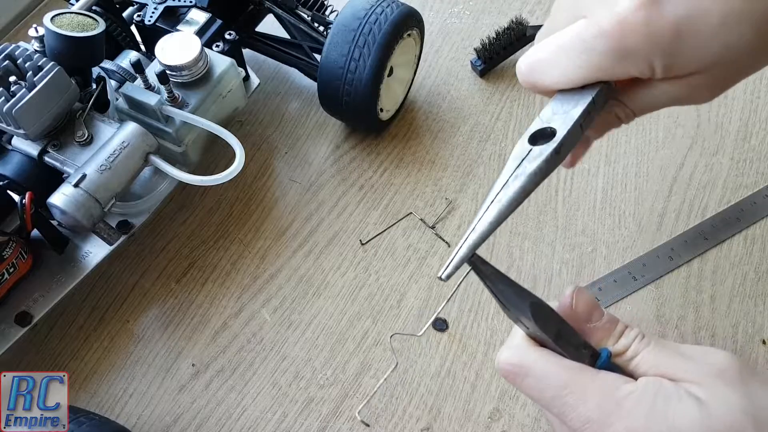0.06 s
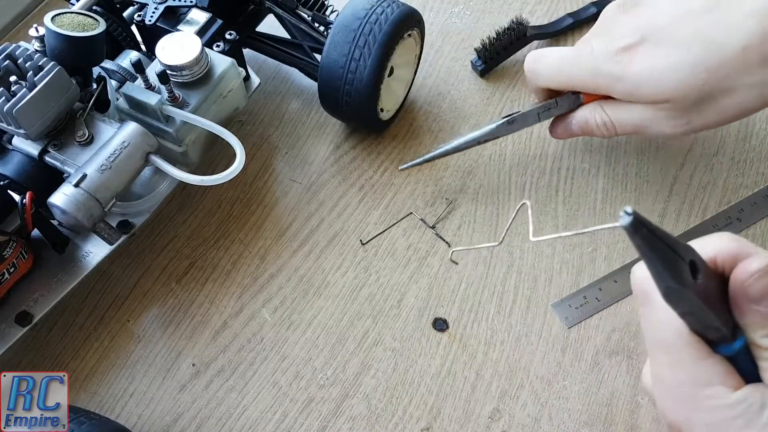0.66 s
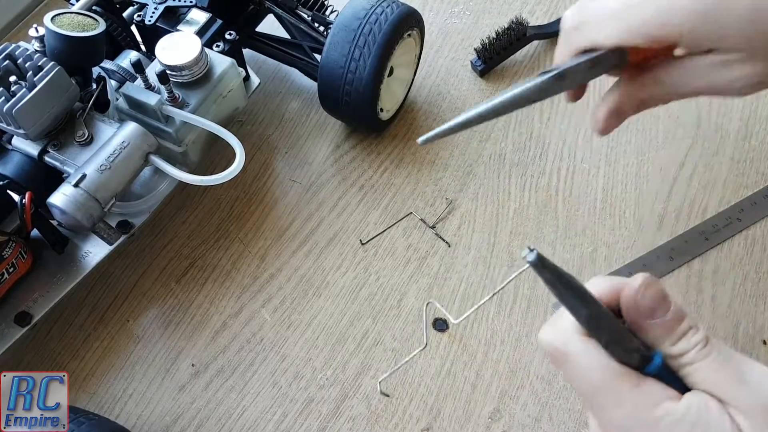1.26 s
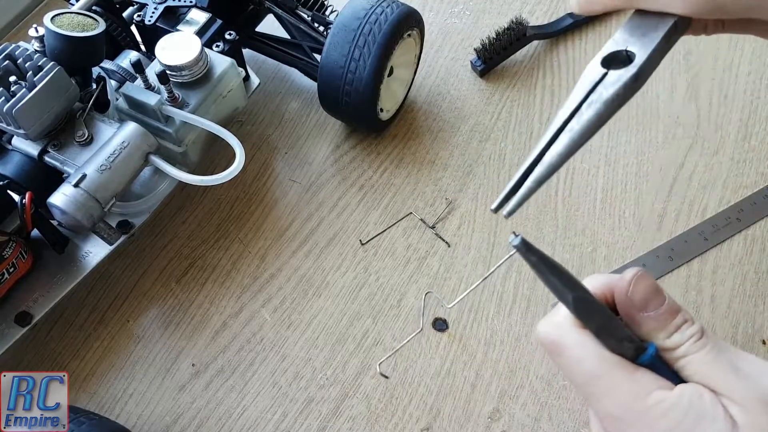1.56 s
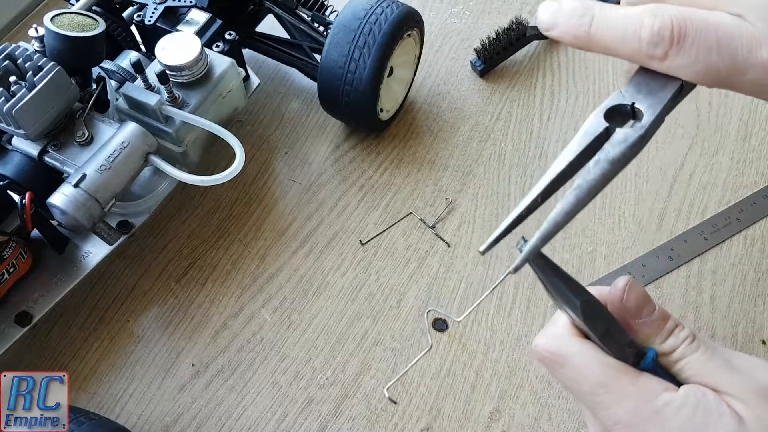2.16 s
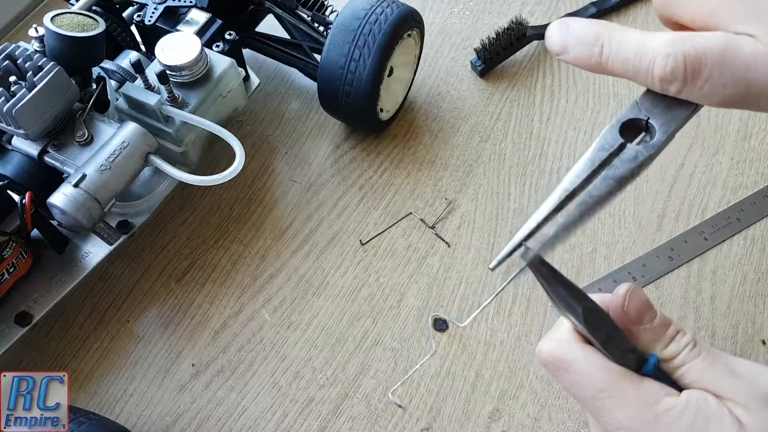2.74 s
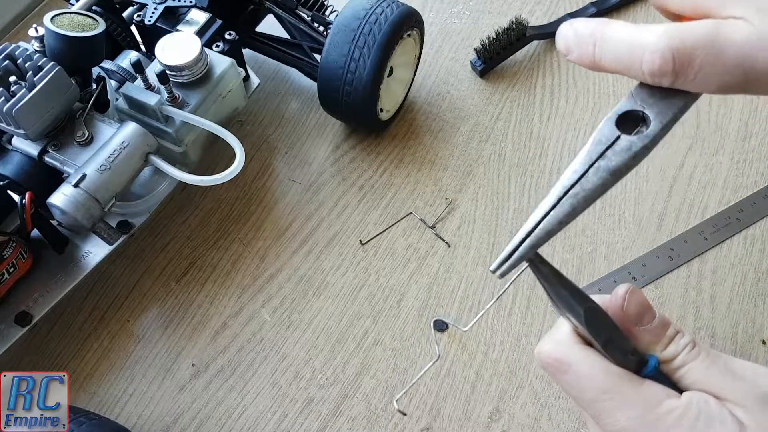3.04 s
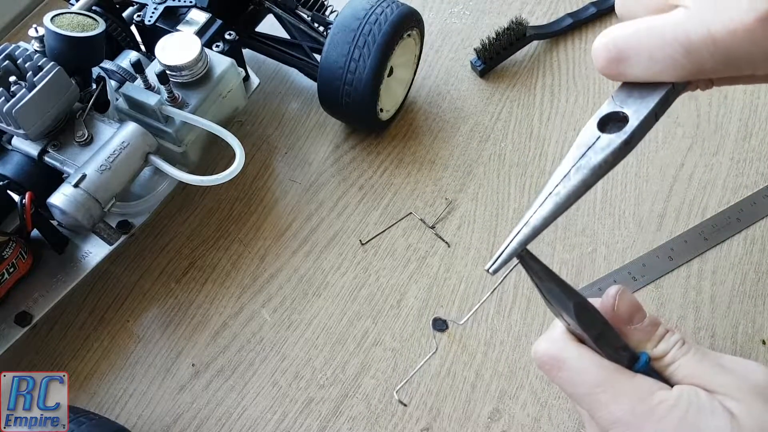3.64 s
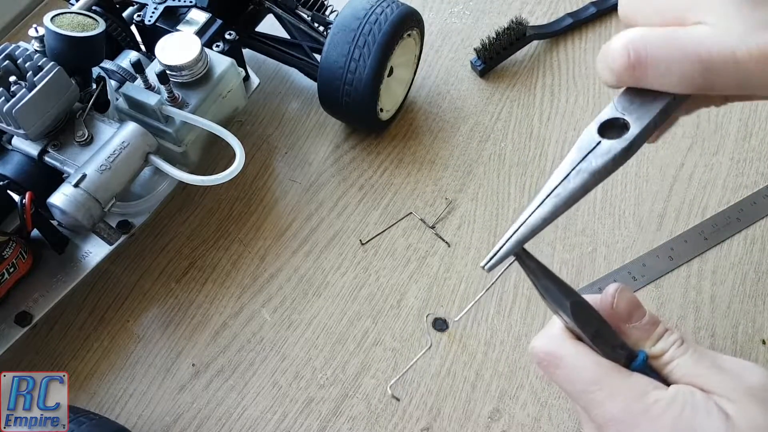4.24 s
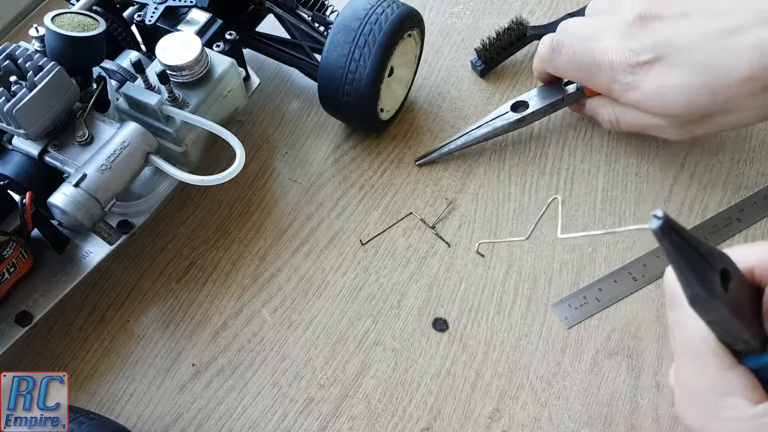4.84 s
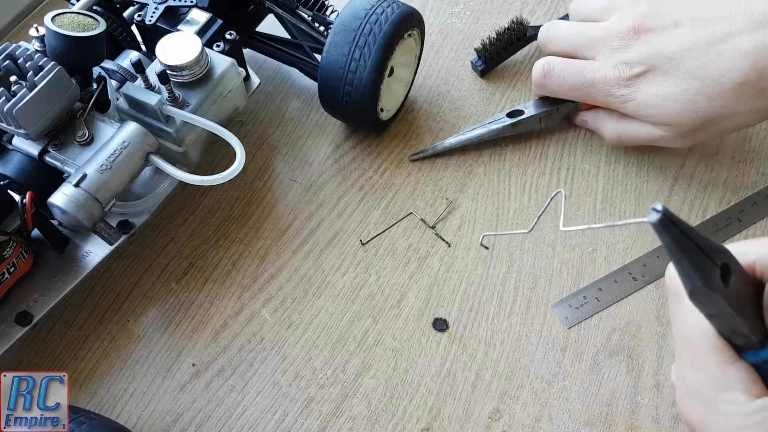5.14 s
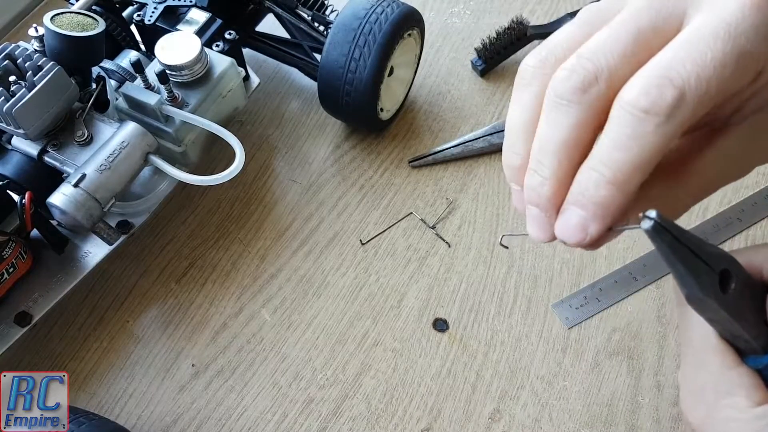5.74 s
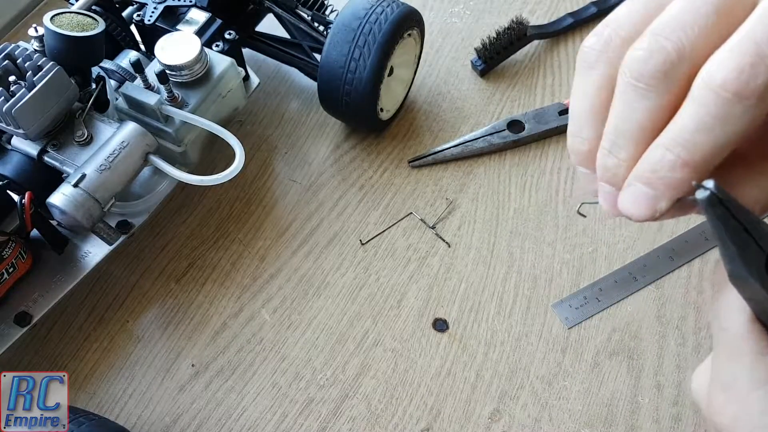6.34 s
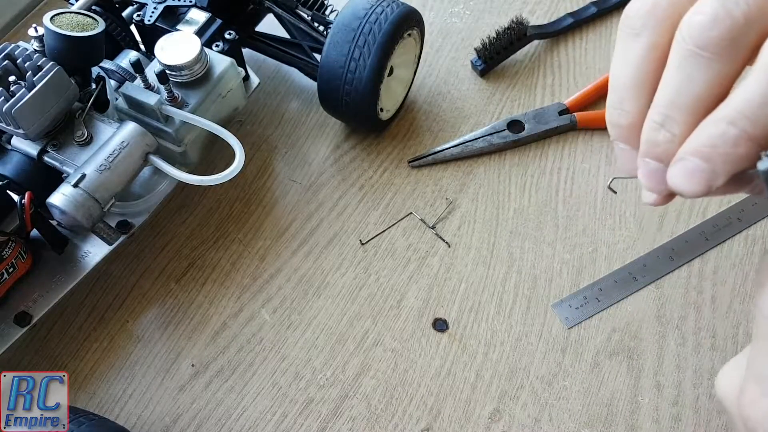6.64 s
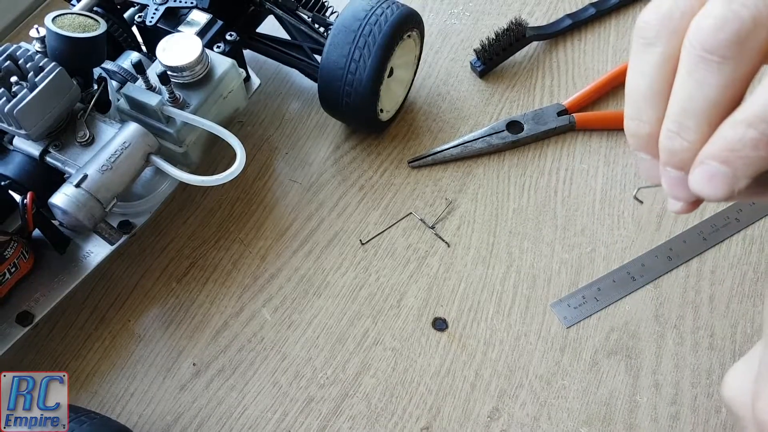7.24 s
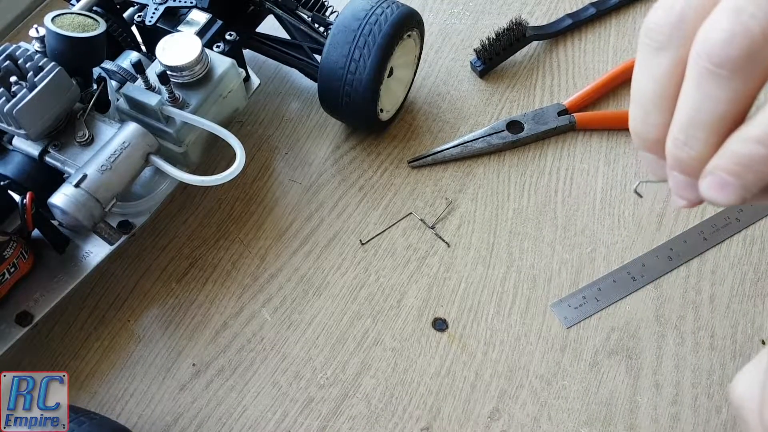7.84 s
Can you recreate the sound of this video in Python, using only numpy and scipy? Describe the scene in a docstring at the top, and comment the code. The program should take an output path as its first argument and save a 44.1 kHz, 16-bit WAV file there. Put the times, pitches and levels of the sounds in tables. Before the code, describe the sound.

Two pairs of small pliers work a thin steel wire, heard close and slightly to the right in a small room with soft air and a low hum. Faint metal ticks open, with a clearer click at 0.5 seconds and a hollow knock on a wooden table at 0.9. From about 2 seconds the jaws tick and scrape lightly along the wire, then snap off sharply at 2.9, leaving a faint, brief twang. A smaller click follows at 3.2 and a light one at 4.4. Around 4.9 and 5.1 seconds one pair knocks on the table, then is laid down with a quick wooden clatter and steel clinks from 5.3 to 5.5, the loudest moment. Afterwards there are only a few tiny ticks. A bird sings very faintly outside from about 5 to 7 seconds, and the quiet hum lasts until about 8.

```python
"""Two pairs of small pliers grip and kink a thin steel wire above a wooden table, close up in stereo.
The jaws tick, scrape and snap off the wire, each contact a crack of noise and a short steel ring;
the freed wire twangs. One pair knocks on the table, stirring the wood's modes, and is then laid down
with a clatter. A small room answers every hit over soft air and a low hum; a bird sings faintly outside."""
import sys
import numpy as np
from scipy import signal
from scipy.fft import rfft, irfft, next_fast_len
from scipy.io import wavfile

SR = 44100
rng = np.random.default_rng(int(sys.argv[2]) if len(sys.argv) > 2 else 0)


def dump_mix(stems):
    """Bounce the given channels to the path in sys.argv[1] as a 16-bit WAV at rate SR."""
    frames = np.atleast_2d(stems).T  # one column per channel
    limited = np.clip(frames, -1, 1)  # hard clip at full scale
    pcm = np.round(limited * 32767).astype(np.int16)
    wavfile.write(sys.argv[1], SR, pcm)


N = 347930
HIT_TIME = np.arange(int(.2 * SR)) / SR  # the seconds over which one hit rings out

# The room's air. Each row: frequency in Hz, relative level in dB.
AIR_SPECTRUM = [(15, -31.5), (25, 0.5), (76, -3), (161, -6.5), (242, -5.5), (285, -9.5), (384, -9.5),
                (416, -15), (531, -17.5), (641, -19), (1040, -20), (2110, -28.5), (3820, -42), (11600, -55),
                (16000, -63.5)]
# The air's low end, one list before and one after the pliers are laid down.
# Each row: time in seconds, level in dB.
RUMBLE_CURVES = [
    [(0.0, -66.5), (1.95, -71), (3.18, -64.5), (4.8, -68.5)],
    [(5.8, -75), (6.54, -68.5), (7.5, -74.5), (7.89, -71.5)],
]
# The hum. Each row: pitch in Hz, width in Hz, loudest level in dB, time of that swell in seconds,
# its half length in seconds.
HUM_TONES = [(68.3, 3, -72.5, 2.6, .5), (128, 2.3, -69.5, 3.2, 0.43), (205.3, 14, -71.5, 3.3, 1.5),
             (237, 4, -69, 3.8, .6), (259.5, 3.6, -69.5, 4.7, 1.2)]
# Light touches on free steel. Each row: start in seconds, level in dB, pitch favoured by the spot
# struck in Hz, its reach in octaves (small for a pure ping).
CLINK_HITS = [(0.12, -61, 1530, 1), (0.213, -53.5, 1360, 0.91), (0.212, -64, 4700, 0.88),
              (0.2577, -56.5, 1160, 0.99), (0.3180, -55, 1760, 1), (0.4995, -47, 6440, 0.34),
              (0.5, -51.5, 3650, 0.17), (0.5002, -48.5, 4760, 0.21), (0.5, -53.5, 1040, .3),
              (0.5012, -49, 2270, 0.4), (2.0047, -55, 1790, 0.72), (2.213, -59, 1700, 0.92),
              (2.4427, -56, 1680, 1), (2.536, -60, 1500, 1), (2.5425, -49, 2500, 1),
              (2.684, -53, 1750, 0.95), (2.881, -35.5, 1820, .7), (2.891, -42.5, 1700, .7),
              (3.1655, -63, 2900, .5), (3.207, -47, 3000, 0.27), (4.3713, -50.5, 3050, 0.14),
              (4.372, -58, 4234, .2), (4.417, -63.5, 4200, .4), (4.418, -55, 1000, .4),
              (6.6303, -64.5, 3490, 0.43), (6.788, -69, 3360, .4)]
# The pliers ringing freely. Each row: pitch in Hz, level in dB, t60 in seconds.
FREE_STEEL_MODES = [(1030.4, -2, 0.075), (1323, 2.5, 0.018), (1717, 6.5, 0.012), (1994, 0, 0.027),
                    (2276, 2, 0.022), (2713, -1, 0.031), (3050, 0.5, 0.01), (3766, -4.5, 0.024),
                    (4310, -6, 0.031), (4807, -5.5, 0.025), (5385, -0.5, 0.014), (6500, -4, 0.0047)]
# Jaws clicking on the wire. Each row: start in seconds, level in dB, top octave in dB (high for a clean
# snap, low for a gripped wire), pitch of the tips in Hz (moves with the grip), crack against ring in dB.
CLICK_HITS = [(0.2124, -60, 10, 7300, 12), (0.2652, -53.5, -1, 7840, 7), (0.3189, -56, 2, 6600, 16),
              (0.501, -36, 6, 6960, 6), (1.036, -53, 4, 7400, 10), (1.4647, -58, 5, 7500, 16),
              (1.947, -45.5, 3.5, 7500, 3), (2.005, -46.5, -9, 7600, 8), (2.0863, -56, -7, 7800, 10),
              (2.212, -49.5, -6, 7900, -6), (2.37, -52, -6, 7600, 9), (2.5429, -44, -7, 8000, 7),
              (2.6832, -50, 1, 7450, 1), (2.7433, -65, -8, 7200, 0), (2.7736, -50, -1, 7350, 6),
              (2.8804, -20, 0.5, 7620, 0), (3.165, -52.5, -4, 7300, 9), (3.207, -31.5, 2.5, 7700, 5),
              (3.3512, -57, -8, 7200, 10), (4.371, -43, -0.5, 8220, 2), (4.418, -57, -7.5, 7140, 8),
              (5.103, -54, 7, 7250, 3), (5.494, -39.5, 7.5, 7170, 13), (5.5854, -49.5, 4.5, 7630, 8),
              (6.223, -63.5, 1, 7500, 5.5), (6.6288, -58.5, 10, 7550, 5), (6.79, -63.5, -6, 6960, 3)]
# The jaws, damped by the hand. Each row: pitch in Hz, level in dB, t60 in seconds.
HELD_JAW_MODES = [(1390, -6, 0.0041), (1592, -1, 0.0055), (2340, -22, 0.033), (2660, -13.5, 0.0138),
                  (4164, -18, 0.007), (5570, -9, 0.009), (6056, -10, .008), (6640, -14, 0.0075),
                  (7410, 7.5, 0.0068), (8000, -5.5, 0.005), (11540, -19.5, 0.00797), (13380, -11, 0.0043),
                  (14300, -10, 0.0045)]
# The crack of steel on steel. Each row: frequency in Hz, relative level in dB.
CRACK_SPECTRUM = [(700, -1.5), (1500, 1.5), (2400, -1.5), (3800, -5), (5500, -4.5), (7500, -2), (8400, -1),
                  (9200, -10.5), (12000, -12.5), (14500, -13)]
# Slides along the wire. Each row: midpoint in seconds, level in dB, half length in seconds.
SLIDES = [(2.023, -72.5, 0.02), (2.219, -64.5, 0.0065), (2.317, -67.5, 0.018), (2.437, -64.5, 0.01),
          (2.536, -67, 0.0093), (2.682, -64, 0.005), (2.8765, -48, .0014), (2.896, -44, 0.0082),
          (2.92, -52, 0.008)]
# Knocks, rebounds and jolts on the table. Each row: start in seconds, level in dB, contact cut-off in Hz,
# bass in dB, flatness from 0 (nose first) to 1 (whole tool), thud pitch in Hz, clink pitch in Hz,
# clink against knock in dB.
TABLE_HITS = [(0.9172, -23.5, 2030, -2, 0.023, 477, 1590, -15.5),
              (1.0355, -39, 1370, 10.5, 0.05, 470, 1610, -16), (1.196, -47.5, 910, 6, 0.18, 500, 1550, -17),
              (2.8792, -47, 257, 4, 0.85, 600, 1513, -10.5), (4.8798, -30, 1580, 13, 0.09, 419, 1890, -18),
              (4.9, -40, 1380, 4, 0.24, 330, 1290, -4), (5.0505, -41.5, 613, 8, 0.13, 402, 4500, -26),
              (5.117, -23, 2240, -3.5, 0.032, 513, 2230, -20), (5.195, -43.5, 410, 6, 1, 350, 1500, -18),
              (5.268, -45.5, 374, 6, 0.83, 400, 2300, -26), (5.334, -16, 1210, 2, 1, 446, 1040, -14.5),
              (5.3445, -25, 1300, -3, 0.59, 676, 2300, -29), (5.356, -23, 1090, -6, 1, 426, 2800, -24),
              (5.358, -20, 910, -7, 0.72, 462, 1100, -10), (5.3684, -19.5, 900, -4, 0.63, 424, 1400, -18),
              (5.3893, -28, 890, -11, 0.65, 430, 1150, -21),
              (5.4233, -12.5, 680, 1, 0.83, 435, 2370, -22.5),
              (5.4379, -18.5, 900, -8, 0.66, 450, 1140, -11.5), (5.45, -23, 1000, 2, 0.96, 401, 1960, -14),
              (5.469, -17, 1900, -5.5, 0.85, 486, 1570, -11), (5.479, -29, 1400, 6, 1, 500, 1680, -13),
              (5.4848, -22, 1300, -2, 1, 473, 1380, -13), (5.515, -29.5, 1230, 2.5, 1, 457, 1330, -9),
              (5.532, -34, 700, -2, .7, 470, 1300, -16)]
# The table top. Each row: pitch in Hz, level in dB, t60 in seconds.
TABLE_MODES = [(121.3, -17, 0.17), (191.6, -24.5, 0.073), (221, -19.5, 0.12), (240.2, -17.5, 0.19),
               (311, -15, 0.09), (362.8, -17, 0.084), (453, -20, 0.15), (500, -33, 0.07),
               (599, -20.5, 0.16), (680.5, -21.5, 0.092), (796, -24.5, 0.12), (1102.4, -9, 0.04),
               (1413, 2.5, 0.028), (1505, -1.5, 0.0089), (1807, -9.5, 0.01296), (2260, -10.5, 0.021)]
# The slap of the whole tool landing flat. Each row: pitch in Hz, level in dB, t60 in seconds.
SLAP_MODES = [(231.4, -9, .016), (890, 0.5, 0.014)]
# The board's many weak modes, blurred into noise. Each row: frequency in Hz, relative level in dB.
BOARD_SPECTRUM = [(50, -18.5), (110, -3), (200, -15), (400, 9.5), (700, 0), (1000, -0.5), (1500, -10),
                  (2600, -7.5), (4000, -19), (9000, -44)]
# The wire springing free. Each row: start in seconds, level in dB.
WIRE_RELEASES = [(2.881, -43), (3.206, -81.5)]
# The free wire, bending two ways at slightly different pitches.
# Each row: pitch in Hz, level in dB, t60 in seconds.
WIRE_MODES = [(1967, -6.5, 0.37), (2488, -5, 0.15), (3970, -10, 0.17), (4768, -3.5, .18),
              (5060, -1.5, 0.17), (4900, 12.5, 0.17), (5280, -1, .22), (5390, -2.5, 0.2), (6200, -4, .17),
              (7490, -4.5, 0.16), (8620, -8, 0.12)]
# A songbird far outside. Each row: start in seconds, length in seconds, first pitch in Hz,
# last pitch in Hz, warble depth in Hz, level in dB.
BIRD_NOTES = [(4.12, .09, 7800, 7130, 108, -89), (5.22, .11, 2100, 2370, 70, -71),
              (5.645, .12, 2135, 2347, 75.6, -70.5), (5.69, .05, 5380, 5300, 30, -91),
              (5.854, 0.16, 2790, 1820, 50, -72), (6.11, .06, 5320, 5390, 30, -93),
              (6.12, .1, 2140, 2216, 100, -74.5), (6.205, 0.13, 2348, 2395, 151, -70),
              (6.65, 0.089, 4200, 4410, 198, -87), (6.97, .05, 4190, 4210, 90.5, -88)]
# The colour of the room's answer. Each row: frequency in Hz, relative level in dB.
REVERB_SPECTRUM = [(100, -1.5), (400, -3.5), (1000, -2.5), (2000, 2.5), (5000, 4.5), (8000, 0.5),
                   (15000, 9.5)]
# How long the room rings. Each row: frequency in Hz, t60 in seconds.
REVERB_T60 = [(100, 0.36), (400, 0.45), (1500, 0.36), (5000, 0.34), (8000, 0.25), (15000, 0.17)]
# The side that the tools favour. Each row: frequency in Hz, left minus right in dB.
TOOL_PAN = [(100, 4), (300, -1.5), (550, -4.5), (1200, 0), (2500, -3), (5000, -3), (7700, -7.5), (8600, 3),
            (10500, 5), (15000, 0.5)]


def undb(db):
    """Decibels to gain."""
    return 10 ** (np.asarray(db) / 20)


def unit(x):
    """Scale to rms 1."""
    return x / np.sqrt(np.mean(x ** 2))


def along(points, hz):
    """Read (Hz, value) points on a log-frequency axis."""
    point_hz, values = np.transpose(points)
    return np.interp(np.log(np.maximum(hz, 1)), np.log(point_hz), values)


def butter(x, hz, kind, order=2):
    """Causal Butterworth filter."""
    sections = signal.butter(order, np.minimum(hz, SR / 2 - 100), kind, fs=SR, output="sos")
    return signal.sosfilt(sections, x)


def bands(x):
    """Split into overlapping half-octave bands; yields (Hz, band)."""
    size = next_fast_len(x.shape[-1])
    spectrum = rfft(x, size)
    half_octaves = 2 * np.log2(np.maximum(np.fft.rfftfreq(size, 1 / SR), 1) / 20)
    for k in range(21):
        window = np.maximum(1 - abs(half_octaves - k), 0)
        yield 20 * 2 ** (k / 2), irfft(spectrum * window, size)[..., :x.shape[-1]]


def colour(x, points):
    """Equalise along a curve of (Hz, dB) points."""
    size = next_fast_len(x.shape[-1])
    gain = undb(along(points, np.fft.rfftfreq(size, 1 / SR)))
    return irfft(rfft(x, size) * gain, size)[..., :x.shape[-1]]


def stereo_noise(size, points, apart_hz):
    """Coloured noise at two microphones: long waves reach both alike, short ones do not."""
    mid, side = colour(rng.standard_normal((2, size)), points)
    side = butter(side, apart_hz, "high")
    return unit(np.array([mid + side, mid - side]))


def wander(rate_hz, count=400):
    """A random drift with a spread near 1."""
    return np.interp(np.arange(N) / SR * rate_hz, np.arange(count), rng.standard_normal(count))


def add(out, s, sound):
    """Mix a sound in at s seconds."""
    i = max(int(s * SR), 0)
    out[:, i:i + sound.shape[1]] += sound[:, :N - i]


def hit_level(x, db):
    """Scale a hit so that the crest of its first five milliseconds lies near db."""
    return x * undb(db) / (2 * np.sqrt(np.mean(x[:, :SR // 200] ** 2)))


def stroke_level(x, shape, db):
    """Scale a stereo stroke so that its rms at the top of its shape lies near db."""
    return x * undb(db) / np.sqrt(np.sum(x ** 2) / (2 * np.sum(shape ** 2)))


def impulses(shape, rate_hz):
    """Randomly timed tiny contacts whose strength follows a shape."""
    return (rng.random(len(shape)) < rate_hz / SR) * rng.standard_normal(len(shape)) * shape


def ring(modes, spread, gain_db=0, lag_s=0, apart_hz=550, tuning=1):
    """Struck modes; each blow weights them anew, and each microphone meets them at its own phase."""
    hz, db, t60 = np.transpose(modes)
    scatter_db, detune, phase = rng.standard_normal((3, len(hz)))
    hz = hz * tuning * (1 + .008 * detune)
    phase = phase * spread * np.minimum(hz / apart_hz, 1) ** 2 - np.pi * hz * lag_s
    waves = np.exp(np.outer(2j * np.pi * hz - np.log(1000) / t60, HIT_TIME))
    gain = undb(db + gain_db + scatter_db)
    return np.real(np.array([gain * np.exp(1j * phase), gain * np.exp(-1j * phase)]) @ waves)


def room_tone(air_db=-62, rumble_hz=220, flicker_db=1, wide_hz=700, hum_sink_db=-9.5, pan_db=-0.9):
    """A bed of soft, flickering air whose low end swells and sinks, with a wavering hum."""
    t = np.arange(N) / SR
    rumble_db = np.interp(t, *np.vstack(RUMBLE_CURVES).T) - air_db
    air = unit(colour(rng.standard_normal((2, N)), AIR_SPECTRUM))
    out, sides = 0, np.array([[1], [-1]])
    for hz, (mid, side) in bands(air):
        width = 0.87 * np.clip(hz / wide_hz, 1 / 4, 1)
        band_db = air_db + rumble_db / (1 + (hz / rumble_hz) ** 2) + flicker_db * wander(rate_hz=13)
        out = out + (mid + width * side * sides) * undb(band_db)
    for hz, width_hz, db, loudest_s, half_s in HUM_TONES:
        drift = wander(width_hz) + 1j * wander(width_hz)
        hum = unit(np.real(drift * np.exp(2j * np.pi * hz * t)))
        sunk = 1 - np.exp(-.5 * ((t - loudest_s) / half_s) ** 2)
        out = out + undb(db + hum_sink_db * sunk) * hum
    return out * undb(sides * pan_db / 2)


def clink(db, spot_hz, reach_octaves=1, fade_db=28, attack_s=0.00037):
    """The free steel rings clearly; modes weaken with their distance from the favoured pitch."""
    hz = np.transpose(FREE_STEEL_MODES)[0]
    distance = np.log2(hz / spot_hz) / reach_octaves
    modes = ring(FREE_STEEL_MODES, spread=.45, gain_db=-fade_db * distance ** 2)
    return hit_level(modes * (1 - np.exp(-HIT_TIME / attack_s)), db)


def plier_clinks():
    """Light touches set the pliers ringing."""
    out = np.zeros((2, N))
    for s, db, spot_hz, reach_octaves in CLINK_HITS:
        add(out, s, clink(db, spot_hz, reach_octaves))
    return out


def steel_contact(treble_db, top_db, tuning, crack_db, crack_s=0.0017, attack_s=0.0012):
    """Steel meets steel: a crack of noise and the short ring of the jaws."""
    treble_hz, top_hz = 3740, 8800
    jaws = ring(HELD_JAW_MODES, spread=0.48, tuning=tuning)
    crack = stereo_noise(len(HIT_TIME), CRACK_SPECTRUM, apart_hz=1830) * np.exp(-HIT_TIME / crack_s)
    hit = (jaws + undb(crack_db) * crack) * (1 - np.exp(-HIT_TIME / attack_s))
    # two shelves set the brightness: the treble, then the very top
    hit = butter(hit, treble_hz, "low") - undb(treble_db) * butter(hit, treble_hz, "high")
    top = butter(hit, 1.184 * top_hz, "high", order=4)
    hit = butter(hit, top_hz, "low", order=8) + undb(top_db) * top
    return butter(hit, 1100, "high")


def jaw_clicks(gain_db=-4, neutral_db=-44, treble_per_db=0.85, average_tips_hz=7490):
    """The jaws seat on the wire or snap off it; the harder the click, the brighter."""
    out = np.zeros((2, N))
    for s, db, top_db, tips_hz, crack_db in CLICK_HITS:
        treble_db = treble_per_db * (db - neutral_db)
        hit = steel_contact(treble_db, top_db, tips_hz / average_tips_hz, crack_db)
        add(out, s, hit_level(hit, db + gain_db))
    return out


def grit(shape, db, centre_hz=2100, teeth_hz=450, step_octaves=.45):
    """Single teeth catch on the wire and ring the steel, each of three spots with its own pitch."""
    out = 0
    for spot in range(3):
        catches = impulses(shape, teeth_hz / 3)
        catches[np.argmax(shape) + spot * SR // 700] += .5  # one sure catch near the top of the stroke
        ping = clink(0, centre_hz * 2 ** (step_octaves * (spot - 1)))
        out = out + signal.fftconvolve(catches[None], ping[:, :SR // 20], axes=1)
    return stroke_level(out, shape, db)


def chatter(shape, db, treble_db, top_db, slips_hz=1600, tuning_scatter=0.091):
    """A run of tiny steel contacts at three spots of the jaws, each tuned a little differently."""
    out = 0
    for _ in range(3):
        slips = impulses(shape, slips_hz / 3)
        tuning = 1 + tuning_scatter * rng.standard_normal()
        contact = steel_contact(treble_db, top_db, tuning, crack_db=13.5)
        out = out + signal.fftconvolve(slips[None], contact[:, :SR // 20], axes=1)
    return stroke_level(out, shape, db)


def jaw_scrapes(neutral_db=-58.5, treble_per_db=0.7, grit_db=2, top_db=-14):
    """The serrated jaws slide along the wire in short swelling runs, and skid after every click."""
    skid_after_s, skid_db, skid_half_s = 0.0072, -27, 0.0019
    skids = [(s + skid_after_s, db + skid_db, skid_half_s) for s, db, *_ in CLICK_HITS]
    out, t = np.zeros((2, N)), np.arange(-SR // 10, SR // 10) / SR
    for s, db, half_s in SLIDES + skids:
        shape = np.exp(-.5 * (t / half_s) ** 2)
        # a firm stroke is brighter; a light, dull one is the grittiest
        treble_db = treble_per_db * (db - neutral_db)
        teeth = grit(shape, db + grit_db) / (1 + undb(treble_db))
        add(out, s + t[0], chatter(shape, db, treble_db, top_db) + teeth)
    return out


def wood_knock(db, contact_hz, bass_db, flatness, thud_hz, attack_s=0.0015, boom_s=0.038, board_s=0.016):
    """The table gives with a thud: the nose knocks hollow, the tool laid flat stirs the whole board."""
    bass_hz, hollow_hz, flat_treble_db, boom_db = 302, 950, -8.5, -21
    thud_db, thud_t60_s = 6, 0.0263
    board_db = np.interp(flatness, [0, 1], [-27, -4.5])
    lowest_hz = np.interp(flatness, [0, 1], [138, 83])
    hz, t = np.transpose(TABLE_MODES)[0], HIT_TIME
    # a flat landing weakens the hollow upper modes
    tilt_db = bass_db / (1 + (hz / bass_hz) ** 4) + flatness * flat_treble_db * (hz > hollow_hz)
    modes = ring(TABLE_MODES, spread=0.92, gain_db=tilt_db, lag_s=0.00009)
    thud = ring([(thud_hz, thud_db, thud_t60_s)], spread=1.0, lag_s=0.00014)
    slap = flatness * ring(SLAP_MODES, spread=0.82)
    # the board's slow bending waves outlast the knock
    boom = unit(butter(rng.standard_normal(len(t)), (105, 380), "bandpass")) * np.exp(-t / boom_s)
    board = stereo_noise(len(t), BOARD_SPECTRUM, apart_hz=560) * np.exp(-t / board_s)
    wood = undb(board_db) * board + undb(boom_db + bass_db) * boom - modes - thud - slap
    wood = wood * (1 - np.exp(-t / attack_s))
    wood = butter(wood, contact_hz, "low")  # a longer contact drives the high modes less
    wood = butter(wood, lowest_hz, "high", order=3)  # the board radiates little deep bass
    return hit_level(wood, db)


def table_knocks(rattle_db=-29, rattle_db_per_octave=3, firm_hz=1000, rattle_s=0.0047):
    """Each blow on the table makes the steel clink too; a harder contact rattles the joint more."""
    out = np.zeros((2, N))
    rattle_shape = np.exp(-HIT_TIME[:SR // 10] / rattle_s)
    for s, db, contact_hz, bass_db, flatness, thud_hz, spot_hz, clink_db in TABLE_HITS:
        knock = wood_knock(db, contact_hz, bass_db, flatness, thud_hz)
        joint_db = rattle_db + rattle_db_per_octave * np.log2(contact_hz / firm_hz)
        add(knock, 0, chatter(rattle_shape, db + joint_db, treble_db=-1, top_db=3, slips_hz=4050))
        add(out, s, knock + clink(db + clink_db, spot_hz))
    return out


def wire_twangs(flutter_hz=130):
    """Let go, the thin wire sings on faintly, fluttering as its free end whips about."""
    out = np.zeros((2, N))
    for s, db in WIRE_RELEASES:
        twang = hit_level(ring(WIRE_MODES, spread=.8), db)
        whip = unit(butter(rng.standard_normal(len(HIT_TIME)), flutter_hz, "low"))
        add(out, s, twang * (1 + whip) / np.sqrt(2))
    return out


def bird(warble_hz=140, settle=2.1, yard_t60_s=.65, early_s=0.011, early_db=8):
    """Whistled notes glide and settle with a fast warble; only their smeared echoes reach indoors."""
    song = np.zeros((1, N))
    for s, length_s, first_hz, last_hz, depth_hz, db in BIRD_NOTES:
        t = np.arange(int(length_s * SR)) / SR
        glide_hz = last_hz + (first_hz - last_hz) * (1 - t / length_s) ** settle
        warble = depth_hz * unit(butter(rng.standard_normal(len(t)), warble_hz, "low"))
        swell = np.sqrt(np.sin(np.pi * t / length_s))
        note = np.sin(2 * np.pi * np.cumsum(glide_hz + warble) / SR) * swell
        add(song, s, undb(db) * unit(note)[None])
    t = np.arange(SR // 2) / SR
    decay = undb(-60 * t / yard_t60_s) + undb(early_db) * np.exp(-t / early_s)
    yard = unit(rng.standard_normal((2, len(t))) * decay) / np.sqrt(len(t))
    return signal.fftconvolve(song, yard, axes=1)[:, :N]


def room_reverb(x, tail_db=-6, build_s=0.001306, echo_db=-15, echo_s=.0105, pan_db=0.5):
    """A near wall sends back one echo amid a dense tail that dies sooner in the treble."""
    t = np.arange(int(.6 * SR)) / SR
    wash = stereo_noise(len(t), REVERB_SPECTRUM, apart_hz=485)
    tail = sum(band * undb(-60 * t / along(REVERB_T60, hz)) for hz, band in bands(wash))
    tail = tail * (1 - np.exp(-(t / build_s) ** 2))
    wall = stereo_noise(len(t), REVERB_SPECTRUM, apart_hz=485) * np.exp(-((t - echo_s) / 0.00057) ** 2)
    answer = (undb(tail_db) * unit(tail) + undb(echo_db) * unit(wall)) / np.sqrt(len(t))
    return signal.fftconvolve(x, answer * undb([[pan_db / 2], [-pan_db / 2]]), axes=1)[:, :N]


def pan_tools(x):
    """The tools lie to the right, yet their top octave reaches the left microphone more easily."""
    size = next_fast_len(N)
    pan_db = along(TOOL_PAN, np.fft.rfftfreq(size, 1 / SR))
    return irfft(rfft(x, size) * undb([pan_db / 2, -pan_db / 2]), size)[:, :N]


def scene():
    """Pliers, wire and table up front in their room; room tone and the bird behind."""
    tools = jaw_clicks() + plier_clinks() + wire_twangs() + jaw_scrapes() + table_knocks()
    return pan_tools(tools + room_reverb(tools)) + room_tone() + bird()


def record(dry):
    """Shed the deepest rumble and cut the top steeply."""
    low_hz, top_hz = 24, 15900
    top_cut = signal.ellip(10, .2, 70, top_hz, fs=SR, output="sos")
    return signal.sosfilt(top_cut, butter(dry, low_hz, "high", order=3))


dry = scene()
out = record(dry)
dump_mix(out)
```